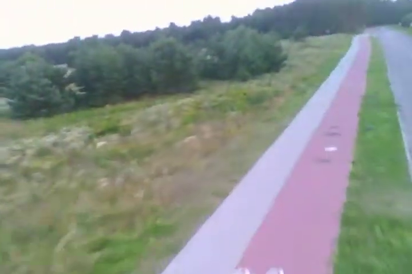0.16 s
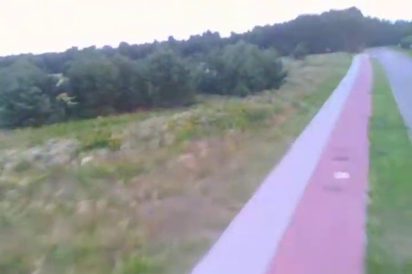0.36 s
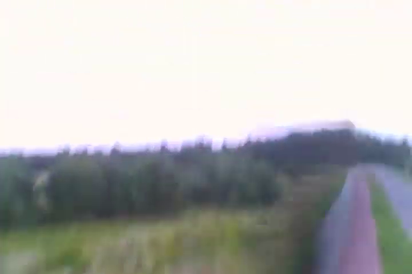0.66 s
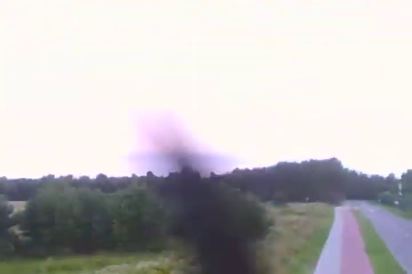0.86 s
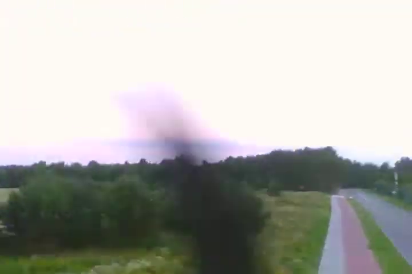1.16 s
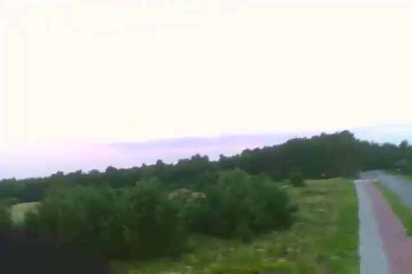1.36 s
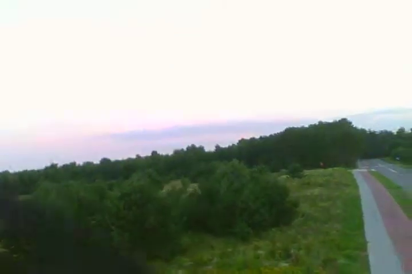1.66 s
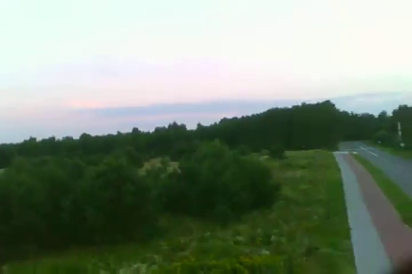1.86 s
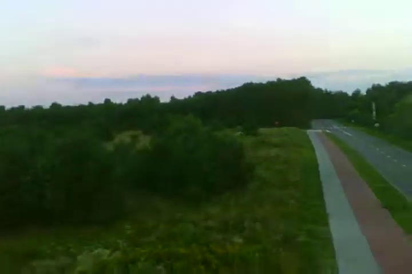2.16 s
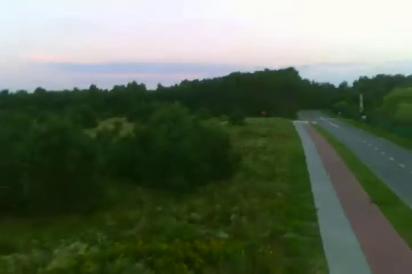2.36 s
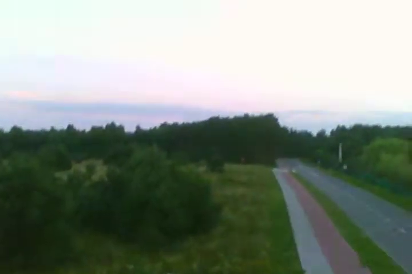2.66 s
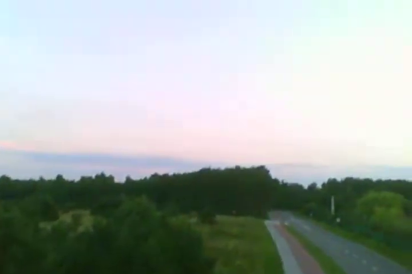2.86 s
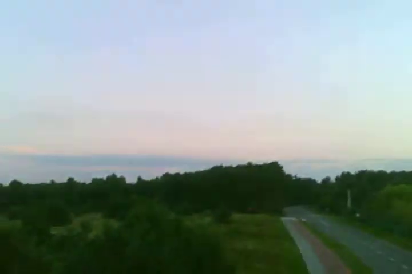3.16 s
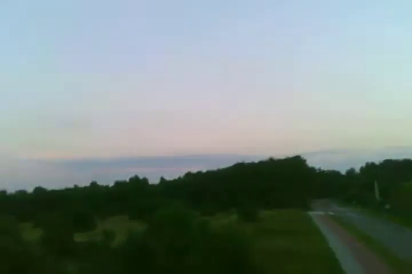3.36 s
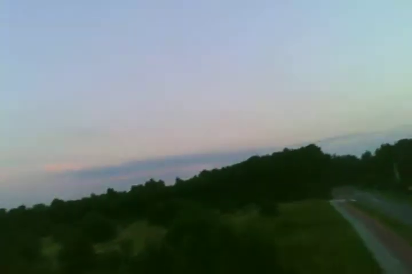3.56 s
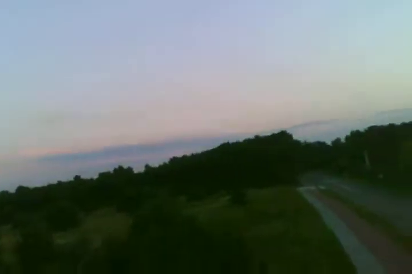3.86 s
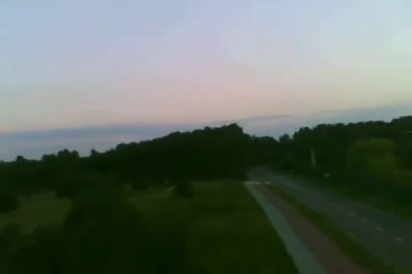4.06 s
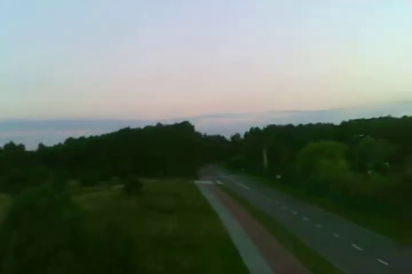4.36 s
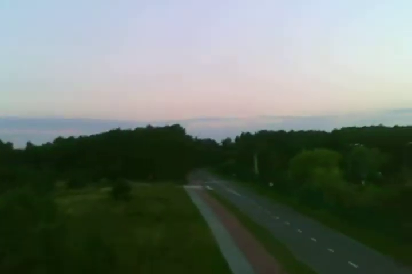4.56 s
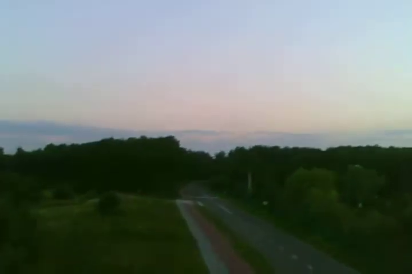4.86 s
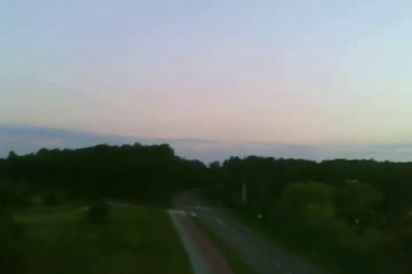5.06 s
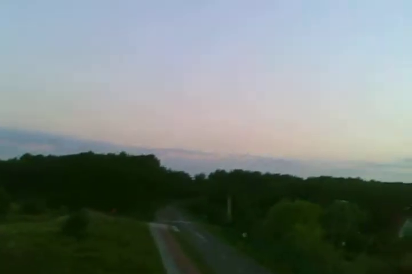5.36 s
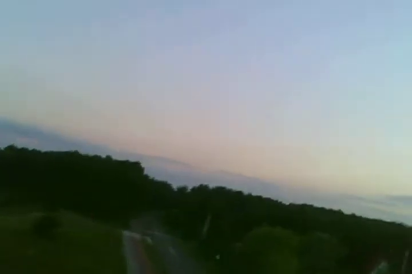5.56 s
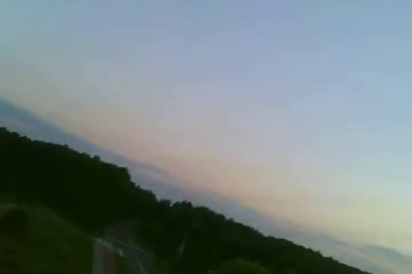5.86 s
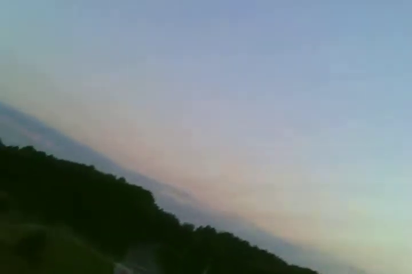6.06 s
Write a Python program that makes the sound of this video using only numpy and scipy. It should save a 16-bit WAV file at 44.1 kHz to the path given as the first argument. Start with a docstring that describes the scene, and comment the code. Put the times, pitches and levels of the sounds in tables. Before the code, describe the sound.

Close on a small electric model plane in open air, a windmilling propeller sends dull, breathy thumps over thin air hiss, slower and slower. A tiny servo chirps. Around two seconds a thin high tone starts and the motor sweeps up quickly into a buzzing hum with rough wind. Later the pitch steps up a little and holds loud to the end. The small onboard microphone is dry, without echo.

```python
"""Slow thumps of propeller wake buffet the microphone first, ever further apart, over a thin hiss of gliding air.
The microphone rides on a small electric model plane, just behind its windmilling two-blade propeller.
Then the speed controller sings a steady tone, the motor spins up in two steps with its coils whining, and the
blades hum as harmonics of the shaft speed in a rough slipstream of filtered noise. A tiny servo whines three times."""
import sys
import numpy as np
from scipy import signal
from scipy.fft import rfft, irfft, next_fast_len
from scipy.io import wavfile
from scipy.ndimage import map_coordinates

SR = 44100
rng = np.random.default_rng(int(sys.argv[2]) if len(sys.argv) > 2 else 0)


def dump(signal):
    """Clip the signal to [-1, 1] and save it as 16-bit WAV at the path in sys.argv[1]."""
    limited = np.clip(np.atleast_2d(signal).T, -1, 1)
    pcm = np.round(limited * 32767).astype(np.int16)
    wavfile.write(sys.argv[1], SR, pcm)


N = 274390
TIME = np.arange(N) / SR

# Throttle openings. Each row: start in seconds, time to settle in seconds, speed gained in turns per second.
THROTTLE_OPENINGS = [(2.065, .915, 128), (4.35, .62, 13.05)]
# Propeller hum over time, before the speed law. Each row: time in seconds, blade tone in dB,
# even overtones in dB, odd overtones of the unequal blades in dB.
BLADE_LEVELS = [(2.33, -22, -35, -42), (2.5, -31.5, -42, -27.5), (2.67, -29, -29, -29),
                (2.82, -31.5, -43, -34), (3.0, -24, -36, -37), (3.27, -24.5, -32, -26),
                (3.47, -21, -31, -26), (3.75, -29, -23.5, -24), (4.2, -23, -31, -24),
                (4.5, -21, -30.5, -24.5), (4.87, -23.5, -35, -24.5), (5.08, -23.5, -27.5, -23.5),
                (5.45, -26, -28.5, -24), (5.86, -22.5, -21.5, -24), (6.2, -27, -26.5, -25)]
# Harmonics of one turn at full throttle. Each row: multiple of the shaft speed, relative level in dB.
TURN_HARMONICS = [(2, 2), (3, -4), (4, -3.5), (5, -7), (6, -9), (7, -12.5), (8, -15), (9, -20), (10, -23.5),
                  (11, -23), (12, -26), (13, -29.5), (14, -39)]
# Once-a-turn shake of the unbalanced propeller, before the speed law. Each row: time in seconds, level in dB.
SHAKE_LEVELS = [(2.6, -35.5), (4.5, -34), (5.15, -30.5), (5.4, -37.5), (5.7, -26.5), (6.22, -24.5)]
# Blade wakes passing the microphone one by one, and their stray puffs.
# Each row: start in seconds, length in seconds, relative level in dB.
BLADE_WAKES = [(.003, .057, -31), (0.198, .06, -33), (0.407, 0.043, -29.5), (.577, .02, -47),
               (0.614, 0.067, -30), (0.801, 0.024, -45), (0.849, 0.077, -31.5), (1.108, 0.093, -33.5),
               (1.394, 0.1, -36.5), (1.726, 0.011, -41.5), (1.747, 0.081, -35), (1.844, 0.0044, -36.5),
               (2.053, 0.031, -37), (2.115, .013, -33.5), (2.146, .012, -32.5), (2.169, 0.029, -40)]
# Hiss of air over the gliding airframe, dying away as the plane slows. Each row: time in seconds, level in dB.
GLIDE_LEVELS = [(0, -50), (.75, -52), (1.3, -59), (1.95, -65)]
# Servo moves. Each row: start in seconds, length in seconds, unloaded whine in Hz, whine level in dB.
SERVO_MOVES = [(.47, .135, 8850, -60), (2.1, .09, 5800, -72), (2.19, .1, 5850, -68.5)]
# Faint steady whistles of the electronics. Each row: frequency in Hz, level in dB.
ELECTRONIC_WHISTLES = [(5599, -83), (7402, -86.5), (9598, -96)]
# Spectrum of a torn blade wake. Each row: frequency in Hz, relative density in dB per Hz.
WAKE_SPECTRUM = [(15, -4), (60, 1.5), (120, -5.5), (250, -13.5), (400, -16.5), (1000, -24), (2000, -30),
                 (2900, -34), (4500, -45), (6000, -48.5), (9000, -53.5), (11000, -76)]
# Spectrum of the slipstream's rush. Each row: frequency in Hz, relative density in dB per Hz.
RUSH_SPECTRUM = [(60, 2), (150, 1.5), (300, -3), (500, -6.5), (1000, -11.5), (1600, -14.5), (2600, -15.5),
                 (3700, -17), (4800, -22), (6000, -20.5), (7300, -28), (8700, -26), (10000, -32.5),
                 (12000, -53.5)]
# Spectrum of the slipstream's deep buffeting. Each row: frequency in Hz, relative density in dB per Hz.
BUFFET_SPECTRUM = [(10, -2), (25, 8), (50, 2), (100, -3), (180, -19), (400, -50), (1500, -76)]
# Spectrum of the gliding hiss. Each row: frequency in Hz, relative density in dB per Hz.
GLIDE_SPECTRUM = [(100, 5), (250, 7), (500, -1), (1000, -2.5), (1900, -9.5), (2900, -10.5), (3900, -5.5),
                  (4900, -18.5), (6000, -17.5), (7000, -24), (8400, -17.5), (10000, -32), (12000, -43)]
# Spectrum of low eddies at the microphone. Each row: frequency in Hz, relative density in dB per Hz.
SWIRL_SPECTRUM = [(12, 3.5), (45, -4.5), (80, 1.5), (120, -8), (200, -15), (400, -26), (1500, -66)]
# Spectrum of the hollow sigh of the glide. Each row: frequency in Hz, relative density in dB per Hz.
SIGH_SPECTRUM = [(1000, -14.5), (2100, -8.5), (2850, -0.5), (3300, -4.5), (3900, -6.5), (4800, -17),
                 (6000, -15), (7000, -24.5), (10000, -23), (12000, -45)]

HUM_POWER = 2.6  # the hum's pressure grows as this power of the speed
# Slipstream levels at full speed, before the rush is mixed (dB), and the powers of the speed they grow by.
RUSH_DB, RUSH_POWER, BUFFET_DB, BUFFET_POWER = -30, 2.66, -24.5, 2.4
# Speed controller: tone (Hz), start of chopping (s), level before the duty law (dB), least share switched on.
SWITCHING_HZ, SWITCH_ON_S, SWITCHING_DB, IDLE_DUTY = 7651.5, 1.968, -48, .055
# Resonance of the motor's casing (Hz), and coil whine at its peak and full speed (dB).
CASING_HZ, CASING_WIDTH_HZ, COIL_DB = 5456, 290, -47.5
TOP_HZ = 12200  # upper limit of the microphone channel


def shaft_speed():
    """Turns a second: each throttle opening pulls the motor up fast, then eases into its new speed."""
    turns_per_second = np.zeros(N)
    for start, settle, gained_hz in THROTTLE_OPENINGS:
        turns_per_second += gained_hz * (1 - (1 - ramp(start, settle)) ** 3)
    return turns_per_second


def propeller(angle, speed, lean=0.57, skew=1.0, wobble=0.017, flutter_db=0.58, blunt_db=26, sharpen=.3):
    """Two unequal blades give pressure harmonics of each turn; gusts shake their timing and size."""
    tone_db, even_db, odd_db = curves(BLADE_LEVELS)
    shake_db, = curves(SHAKE_LEVELS)
    angle = angle + wobble * walk(90)  # radians
    edge_db = 0.25 * walk(25)
    pressure = undb(shake_db) * np.cos(angle + lean)
    for multiple, order_db in TURN_HARMONICS:
        k = round(multiple)
        odd = k % 2  # odd multiples come from the difference between the blades
        if odd:
            follows_even = sharpen if k > 3 else 0  # sharper pulses lift the high odd multiples too
        else:
            follows_even = 1
        overtone_db = odd_db + follows_even * (even_db - odd_db) + edge_db
        overtone_db -= blunt_db * (1 - speed) * np.clip(k - 4, 0, 4)  # slower blades make blunter pulses
        level_db = order_db + (overtone_db if k > 2 else tone_db)
        pressure += undb(level_db) * np.cos(k * angle + lean + odd * skew)
    flutter = undb(flutter_db * walk(70))
    return np.sqrt(2) * pressure * speed ** HUM_POWER * flutter


def slipstream(angle, speed, lead=0.96, chop_db=3.0, slow_chop_db=3, rush_db=2.5, smooth_db=-3,
               eddy_hz=4000, eddy_share=0.65, treble_hz=3300, treble_power=1.5):
    """A turbulent wake follows each blade; smoother wash and deep buffeting fill the gaps. All grow with speed."""
    depth_db = chop_db + slow_chop_db * (1 - speed)  # slower blades leave deeper gaps
    gate = undb(depth_db * np.cos(2 * (angle + lead))) * (speed > 0)
    chopped = colour(gate * eddies(rate=490, spread_db=1.0), RUSH_SPECTRUM)
    chopped = darken(chopped, eddy_hz, eddy_share)
    wash = colour(rng.standard_normal(N), RUSH_SPECTRUM)
    rush = undb(rush_db) * chopped + undb(smooth_db) * wash
    rush = darken(rush, treble_hz, speed ** treble_power)  # faster blades shed finer eddies
    buffet = colour(eddies(rate=14, spread_db=1.0), BUFFET_SPECTRUM)
    return undb(RUSH_DB) * speed ** RUSH_POWER * rush + undb(BUFFET_DB) * speed ** BUFFET_POWER * buffet


def windmill(attack_s=0.002, release_s=0.0043, crown_db=3, fringe_s=0.039, fringe_db=-20,
             skirt_s=0.06, skirt_db=-30, wake_db=8.5, swing_db=13.5, swing_width=0.61,
             push_power=0.56, fine_hz=3500, fine_follow=0.36):
    """Each slow blade drags a sharp-edged turbulent wake over the microphone, in a skirt of low eddies."""
    wake, skirt, swing = np.zeros((3, N))
    longest = max(length for _, length, _ in BLADE_WAKES)
    for start, length, db in BLADE_WAKES:
        offset = TIME - start - length / 2  # seconds from the middle of the wake
        across = offset / length
        beyond = np.maximum(np.abs(offset) - length / 2, 0)
        edge = np.exp(-beyond / np.where(offset < 0, attack_s, release_s))
        core = edge * undb(-crown_db * np.minimum((2 * across) ** 2, 1))  # strongest in the middle
        fringe = undb(fringe_db) * np.exp(-beyond / fringe_s) * (offset < 0)  # stray eddies run ahead
        wake += undb(db) * np.maximum(core, fringe)
        push = undb(db) * (length / longest) ** push_power  # brief flicks move little air
        skirt = np.maximum(skirt, push * np.exp(-beyond / skirt_s))
        # suction, then overpressure
        swing += push * np.sin(2 * np.pi * across) * np.exp(-(across / swing_width) ** 2 / 2)
    bursts = kicks(rate=4500, spread_db=3.8) * undb(3.2 * walk(400))
    tearing = colour(wake * bursts, WAKE_SPECTRUM) * np.sqrt(np.mean(wake ** 2))
    air_db, = curves(GLIDE_LEVELS)
    tearing = darken(tearing, fine_hz, undb(fine_follow * (air_db - air_db[0])))  # slower air, duller wakes
    swirl = skirt / skirt.max() * colour(rng.standard_normal(N), SWIRL_SPECTRUM)
    return undb(wake_db) * tearing + undb(swing_db) * swing + undb(skirt_db) * swirl


def motor(angle, speed, shaft_hz, release_s=.25):
    """Chopped current sings at part throttle; coils whine at each commutation and ring the casing."""
    commutations = 42  # a turn
    duty = np.clip(speed, IDLE_DUTY, 1)  # share of each cycle switched on
    # chopping fades out as the last throttle opening begins
    chopping = (TIME > SWITCH_ON_S) * (1 - ramp(THROTTLE_OPENINGS[-1][0], release_s))
    ripple = chopping * duty * np.sqrt(1 - duty)
    switching = undb(SWITCHING_DB) * ripple * np.sin(2 * np.pi * SWITCHING_HZ * TIME)
    switching *= 1 + .14 * np.cos(4 * angle)  # pulses four times a turn
    casing = 1 / (1 + (2 * (commutations * shaft_hz - CASING_HZ) / CASING_WIDTH_HZ) ** 2)
    coil_level = speed * casing * undb(COIL_DB + 1.3 * walk(40))
    coils = coil_level * np.sin(commutations * angle + 0.32 * walk(55))
    return np.sqrt(2) * (switching + coils)


def servo(waver_hz=70, gear_db=-9, sag=0.077, heaviest=.42, fade_s=0.0056):
    """A tiny motor trims a control surface, its whine sagging under load; its gear sings an octave below."""
    out = np.zeros(N)
    waver = waver_hz * (walk(700) + walk(90))
    rattle = walk(300)
    for start, length, hz, db in SERVO_MOVES:
        load = np.interp(ramp(start, length), [0, heaviest, 1], [0, 1, 0])
        phase = 2 * np.pi * np.cumsum(hz * (1 - sag * load) + waver) / SR
        running = ramp(start, fade_s) - ramp(start + length - fade_s, fade_s)
        gear = undb(gear_db) * rattle * np.sin(phase / 2)
        out += undb(db) * running * (np.sin(phase) + gear)
    return np.sqrt(2) * out


def glide(rumble_db=-40, sigh_db=-58, follow=0.37):
    """Turbulent air hisses round the airframe, sighs at its edges, and flutters low at the microphone."""
    db, = curves(GLIDE_LEVELS)
    hiss = colour(eddies(rate=120, spread_db=1.9), GLIDE_SPECTRUM)
    sigh = colour(eddies(rate=13, spread_db=2.0), SIGH_SPECTRUM)
    rumble = colour(eddies(rate=60, spread_db=2.0), SWIRL_SPECTRUM)
    lingering = undb(follow * (db - db[0]))  # sigh and flutter die away more slowly than the hiss
    return undb(db) * hiss + lingering * (undb(sigh_db) * sigh + undb(rumble_db) * rumble)


def electronics():
    """The electronics whistle faintly, as steady sine tones."""
    return np.sqrt(2) * sum(undb(db) * np.sin(2 * np.pi * hz * TIME) for hz, db in ELECTRONIC_WHISTLES)


def eddies(rate, spread_db):
    """Turbulence: random pressure kicks that arrive in brief clumps."""
    return unit(rng.standard_normal(N) * undb(spread_db * walk(rate)))


def kicks(rate, spread_db):
    """Eddies bursting on the microphone: sudden pressure steps of scattered size, rate a second."""
    struck = rng.random(N) < rate / SR
    return struck * rng.choice([-1, 1], N) * undb(spread_db * rng.standard_normal(N))


def walk(rate):
    """Smooth chance with spread 1, changing rate times a second."""
    knots = rng.standard_normal(N // 8)
    return unit(map_coordinates(knots, [TIME * rate], order=3, mode="wrap"))


def colour(x, points):
    """Causal minimum-phase filter with a (Hz, dB) outline; rms 1."""
    hz, db = np.transpose(points)
    size = next_fast_len(N + SR // 2)
    size += size % 2
    freq = np.maximum(np.arange(size // 2 + 1) * SR / size, 1)
    gain = undb(np.interp(np.log(freq), np.log(hz), db))
    cepstrum = irfft(np.log(gain))
    cepstrum[1:size // 2] *= 2  # fold onto positive time, so nothing sounds early
    cepstrum[size // 2 + 1:] = 0
    response = np.exp(rfft(cepstrum))
    return unit(irfft(rfft(x, size) * response)[:N])


def darken(x, hz, share):
    """Keep only a share of the treble above hz."""
    dull = signal.sosfiltfilt(signal.butter(2, hz, fs=SR, output="sos"), x)
    return dull + share * (x - dull)


def curves(table):
    """Each column of a time table, joined by straight lines."""
    s, *columns = np.transpose(table)
    return [np.interp(TIME, s, column) for column in columns]


def ramp(start, length):
    """Rises from 0 to 1 over length seconds."""
    return np.clip((TIME - start) / length, 0, 1)


def undb(db):
    """Decibels to gain."""
    return 10 ** (np.asarray(db) / 20)


def unit(x):
    """Scale to rms 1."""
    return x / np.sqrt(np.mean(x ** 2))


def scene():
    """Everything rides on the plane with the microphone: no distance, no echo."""
    shaft_hz = shaft_speed()
    angle = 2 * np.pi * np.cumsum(shaft_hz) / SR
    speed = shaft_hz / shaft_hz.max()  # share of full speed
    blades = propeller(angle, speed) + slipstream(angle, speed) + windmill()
    machinery = motor(angle, speed, shaft_hz) + servo()
    background = glide() + electronics()
    return (blades + machinery + background)[None]


def record(dry):
    """The little on-board microphone channel cuts the top steeply."""
    return signal.sosfilt(signal.ellip(10, .2, 80, TOP_HZ, fs=SR, output="sos"), dry)


dry = scene()
out = record(dry)
dump(out)
```